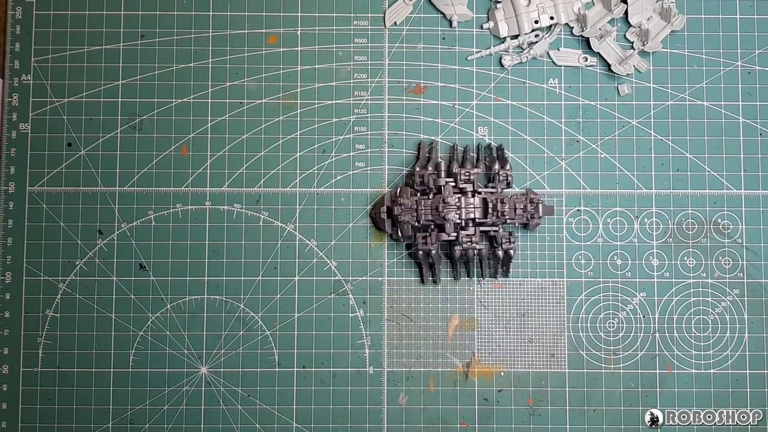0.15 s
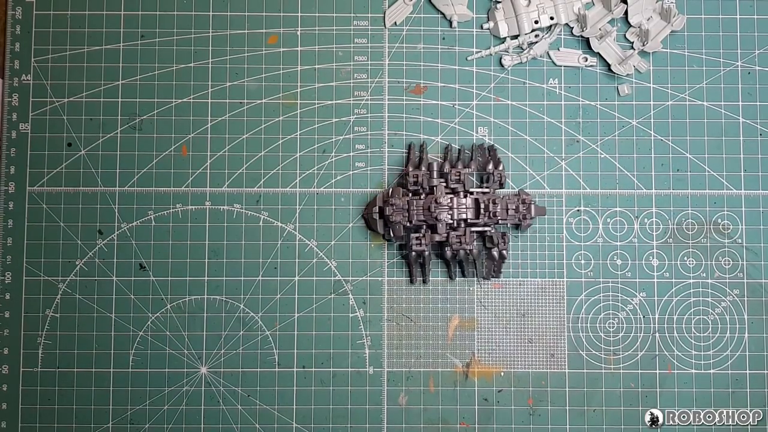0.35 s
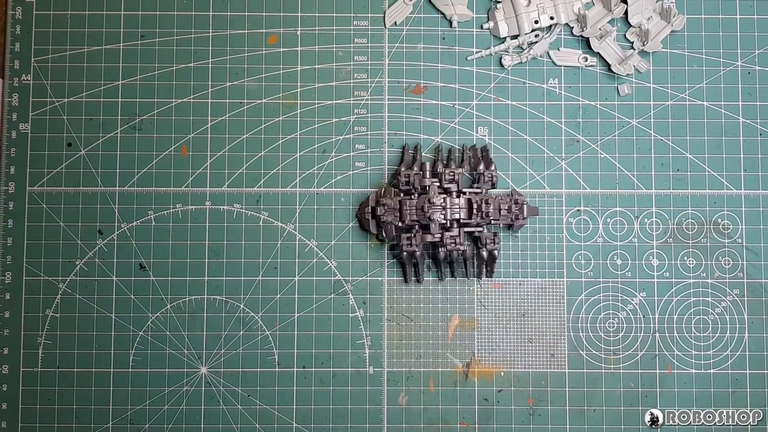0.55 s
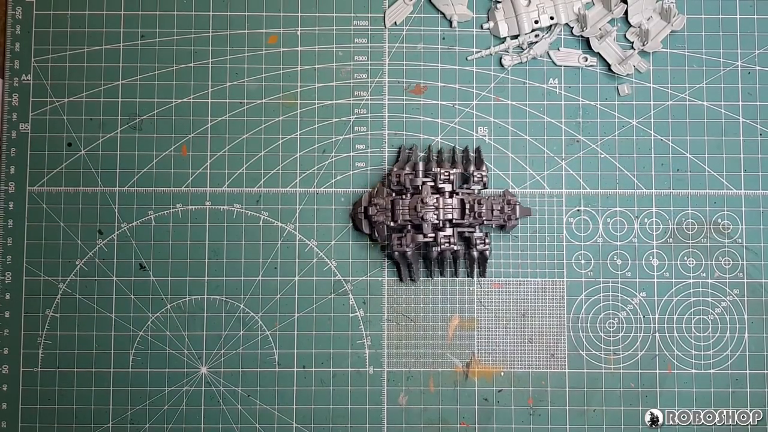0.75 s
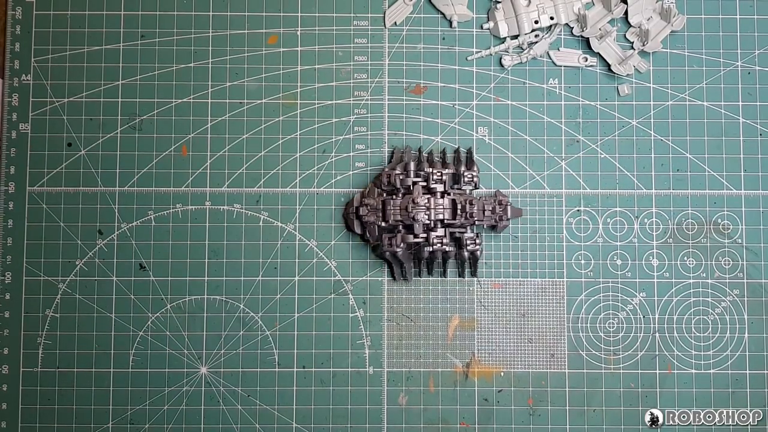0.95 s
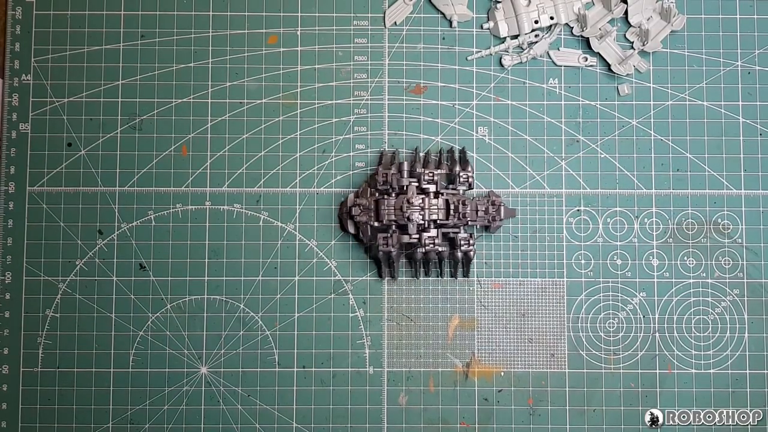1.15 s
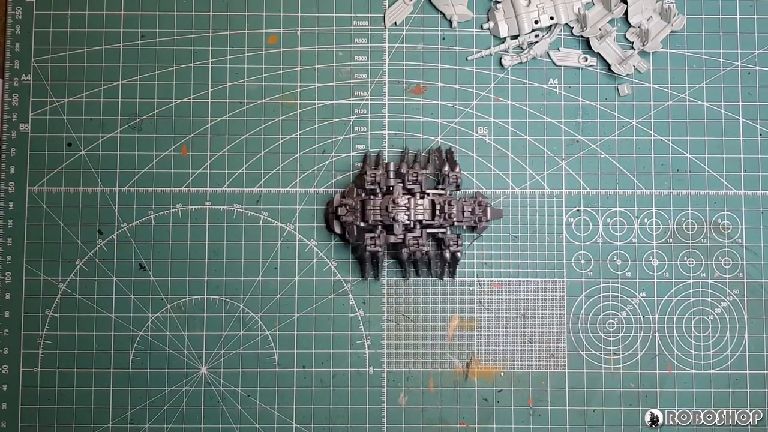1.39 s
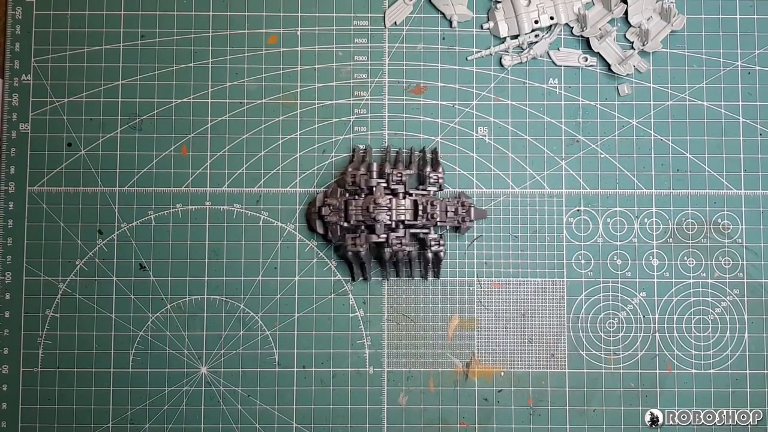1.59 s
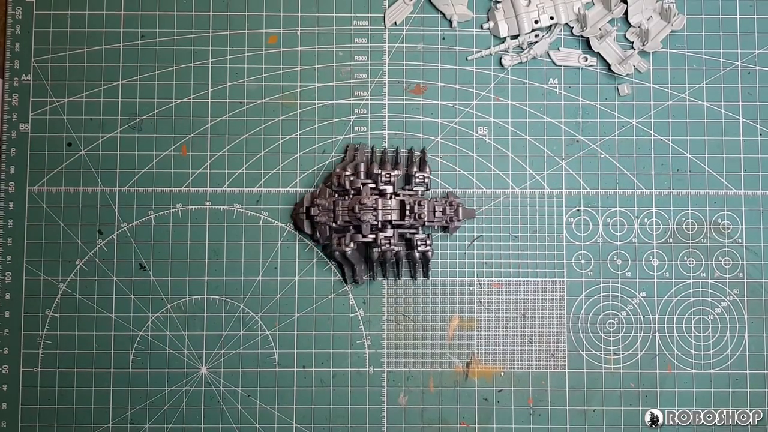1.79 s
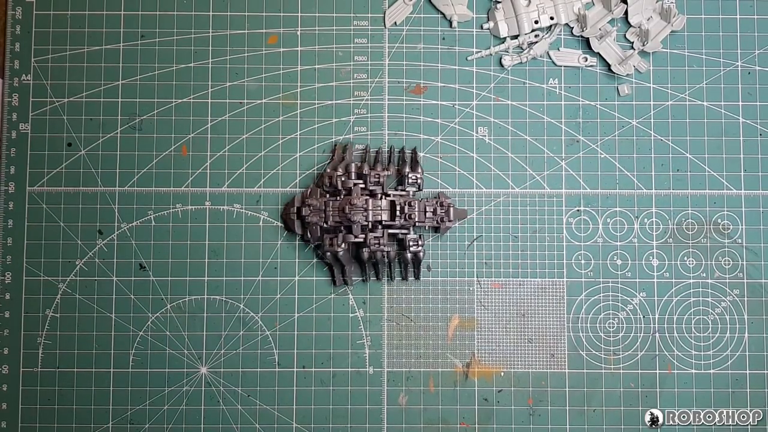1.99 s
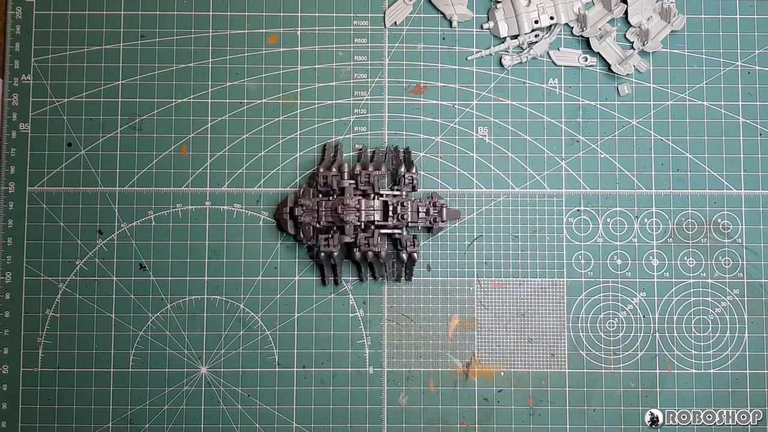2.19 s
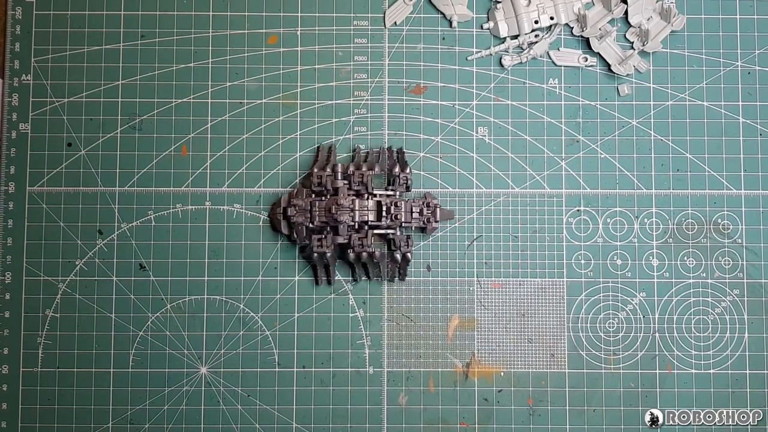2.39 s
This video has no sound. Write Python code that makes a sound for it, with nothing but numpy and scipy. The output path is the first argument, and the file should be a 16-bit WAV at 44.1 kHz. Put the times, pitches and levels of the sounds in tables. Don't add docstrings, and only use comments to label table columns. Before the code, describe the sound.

Thin, bright clockwork chatter of a tiny wind-up walking toy, wavering in speed, in a quiet room

```python
import sys
import numpy as np
from scipy import signal
from scipy.fft import rfft, irfft
from scipy.io import wavfile
from scipy.ndimage import uniform_filter1d

SR = 44100
rng = np.random.default_rng(int(sys.argv[2]) if len(sys.argv) > 2 else 0)


def inscribe(sig):
    pcm = np.round(np.clip(np.atleast_2d(sig).T, -1, 1) * 32767)
    wavfile.write(sys.argv[1], SR, pcm.astype(np.int16))


def natural_amplitude(level_db):
    exponent = np.asarray(level_db, float) / 20
    return 10 ** exponent


N = 107559


def rms_one(x):
    return x / np.sqrt(np.mean(x ** 2) + 1e-20)


def in_time(rows):
    s, *columns = np.transpose(rows)
    return [np.interp(np.arange(N) / SR, s, column) for column in columns]


def drift(rate):
    r = np.exp(-80 * np.pi * rate / SR)
    noise = rng.standard_normal(N // 40 + 2002)
    slow = signal.lfilter([1], [1, -2 * r, r * r], noise)[2000:]
    return np.interp(np.arange(N) / 40, np.arange(len(slow)), rms_one(slow))


def band(x, hz, width_hz):
    edges = [hz - width_hz / 2, hz + width_hz / 2]
    return signal.sosfilt(signal.butter(2, edges, "band", fs=SR, output="sos"), x)


def teeth():
    # time in seconds, rate in teeth per second.
    tooth_rate = [(0, 600), (.25, 608), (.45, 565), (.6, 528), (.8, 470), (.95, 508), (1.1, 533),
                  (1.27, 512), (1.38, 580), (1.5, 645), (1.68, 625), (1.8, 590), (1.96, 595), (2.04, 530),
                  (2.15, 525), (2.25, 485), (2.44, 500)]
    # time in seconds, slack from 0 to 1.
    looseness = [(0, 0.23), (.3, 0.94), (.5, 0.23), (.7, 0.82), (.95, 1.0), (1.15, 0.34), (1.5, 0.04),
                 (1.9, 0.02), (2.44, 0.26)]
    speed_waver = 0.035
    jitter, tooth_spread_db = 0.07, 2.5
    odd_tooth_db, teeth_per_turn = 4, 21
    wobble_db, rattle_ms = 2, 0.52
    grind, tick_share = 0.78, 0.83
    rate, = in_time(tooth_rate)
    slack = np.clip(in_time(looseness)[0], 0, 2)
    turn = np.cumsum(rate * (1 + speed_waver * drift(18))) / SR
    tooth = np.arange(1600)
    time_luck, size_luck, sign_luck = rng.standard_normal((3, len(tooth)))
    at = np.interp(tooth + jitter * time_luck, turn, np.arange(N)).astype(int)
    size_db = tooth_spread_db * (0.5 + slack[at]) * size_luck
    size_db = size_db + odd_tooth_db * slack[at] * (tooth % 2 - 3.0)
    size = natural_amplitude(size_db) * (tooth < turn[-1])
    r = np.exp(-1000 / rattle_ms / SR)
    bursts = rms_one(signal.lfilter([1], [1, -r], np.bincount(at, size, N)))
    clicks = rms_one(np.bincount(at, size * np.sign(sign_luck), N))
    wheel = np.sin(2 * np.pi * turn / teeth_per_turn + 1.33 * drift(5.6))
    flutter = natural_amplitude(wobble_db * slack * (wheel + 0.34 * drift(40)) + 0.5 * drift(11))
    return (bursts + grind) * flutter, tick_share * clicks * flutter


def hollows(mesh, ticks):
    # start in seconds, end in seconds, first pitch in Hz, last pitch in Hz, level in dB.
    slides = [
        (.12, 0.51, 4200, 4100, -9),
        (1.33, 1.62, 7800, 7600, -1.5),
        (1.8, 2.3, 7400, 6600, -11),
        (1.45, 1.9, 11400, 10000, -2.5),
        (2.02, 3, 5400, 4750, -8),
        (1.42, 1.9, 4200, 3600, -8.5),
        (1.9, 2.3, 2950, 3100, -13),
        (0.94, 1.45, 3100, 3000, -10),
    ]
    width_hz = 480
    t, out = np.arange(N) / SR, 0
    low = signal.butter(2, width_hz / 2, fs=SR, output="sos")
    for start, end, from_hz, to_hz, db in slides:
        part = np.clip((t - start) / (end - start), 0, 1)
        phase = 2 * np.pi * np.cumsum(from_hz + part * (to_hz - from_hz)) / SR
        a, b = signal.sosfilt(low, mesh * rng.standard_normal((2, N)) + ticks)
        swell = np.sqrt(np.sin(np.pi * part).clip(0))
        carried = np.sqrt(2) * (a * np.cos(phase) + b * np.sin(phase))
        out = out + natural_amplitude(db) * swell * carried
    return out


def gearbox(mesh, ticks):
    # time in seconds, level in dB.
    gear_level = [(0.0, -45), (0.22, -47.5), (0.5, -48), (0.54, -51), (0.65, -47.5), (0.66, -53),
                  (0.69, -48.5), (0.9, -50.5), (0.93, -49.5), (1.32, -50), (1.39, -46), (1.81, -47),
                  (1.82, -48.5), (2.0, -47.5), (2.01, -50), (2.33, -49.5), (2.44, -50.5)]
    # time in seconds, strain from 0 to 1, lean from 0 to 1.
    posture = [(0, 0.03, 0), (.13, .15, 0.2), (.3, 0.22, .5), (.5, 0.47, 0), (.56, 0.2, 0.25),
               (.95, 0, 0.24), (1.1, 0.5, 0.2), (1.3, 0.57, 0.2), (1.42, .95, 0.26), (1.55, 0.8, 0.4),
               (1.8, 0.86, 0), (1.99, 1, 0.5), (2.02, 0.84, 1.0), (2.25, 0.62, .9), (2.44, 0.53, 0.4)]
    # frequency in Hz, width in Hz, level at rest in dB,
    # gain by strain in dB, gain by lean in dB.
    shell_modes = [(3226, 478, -11.5, 4, 4), (3970, 650, -8, 5, -10), (4584, 790, -9, 2, 3.5),
                   (5400, 1000, -16.5, 9, 0), (6434, 740, -9.5, 7.5, -1.5), (7090, 625, 2, -7, -1.5),
                   (7760, 610, -8.5, 7.5, -9.5), (8500, 380, -8, -2, 2), (9700, 1600, -13, 0.5, -7.5),
                   (10220, 840, -9, 4.5, 2), (11160, 700, -13, 9.5, 1.5), (11900, 2000, -14, 5, -6.5),
                   (14160, 1200, -8, -12, -8), (14900, 1500, -13.5, 4.5, 3.5)]
    # frequency in Hz, width in Hz, level at rest in dB,
    # gain by strain in dB.
    plate_modes = [(3475, 250, -14.5, 4), (6350, 84, -18.5, 4), (6625, 33, -4.5, 2.5), (7290, 53, 3.5, -3),
                   (10200, 54, -8.5, -1), (10760, 33, -9, 8), (10600, 35, -11, 17), (11370, 26, -12, 9)]
    own_db, shell_edge_hz = 0.76, 2736
    strain, lean = in_time(posture)
    out = hollows(mesh, ticks)
    for hz, width, db, strain_db, lean_db in shell_modes:
        gain = natural_amplitude(db + strain * strain_db + lean * lean_db + own_db * drift(8.6))
        out = out + gain * band(mesh * rng.standard_normal(N) + ticks, hz, width)
    for hz, width, db, strain_db in plate_modes:
        gain = natural_amplitude(db + strain * strain_db + 2.04 * drift(7.1))
        out = out + gain * band(mesh * rng.standard_normal(N), hz, width)
    out = signal.sosfilt(signal.butter(4, shell_edge_hz, "high", fs=SR, output="sos"), out)
    running_rms = np.sqrt(uniform_filter1d(out ** 2, size=4000))
    return natural_amplitude(in_time(gear_level)[0]) * out / running_rms


def belly(mesh, ticks):
    # time in seconds, level in dB.
    belly_level = [(0.0, -64.5), (0.08, -68.5), (0.21, -62.5), (0.55, -67), (0.6, -63), (0.77, -69.5),
                   (1.07, -68.5), (1.09, -61.5), (1.16, -71), (1.18, -60), (1.23, -60.5), (1.83, -71.5),
                   (1.92, -67.5), (1.93, -72.5), (2.24, -65), (2.44, -65.5)]
    # time in seconds, shift from -1 (aft) to 1 (fore).
    weight_shift = [(0, -.3), (.15, -0.54), (.43, -1.2), (.52, 0.79), (.63, 0.18), (.7, 0.28), (.8, 0.57),
                    (1.02, 0.67), (1.1, -0.49), (1.2, 0.31), (1.35, -0.19), (1.5, 0.0069), (1.8, 0.17),
                    (2.1, 0.42), (2.33, -0.88), (2.44, 0.62)]
    # frequency in Hz, width in Hz, level in dB, gain by shift in dB.
    hull_modes = [(916, 128, -11.5, -2), (1075.4, 78, 1, -4.5), (1300, 403, -2.5, -2.5),
                  (1414, 95, -6.5, 5), (1535, 95, 1.5, 3), (1670, 120, -2, 7), (1930, 540, -11.5, 1)]
    hull_tick = 0.23
    shift, = in_time(weight_shift)
    push = hull_tick * rms_one(abs(ticks))
    out = 0
    for hz, width, db, shift_db in hull_modes:
        gain = natural_amplitude(db + shift * shift_db + 1.4 * drift(7.7))
        out = out + gain * band((mesh + 1.8) * rng.standard_normal(N) + push, hz, width)
    return natural_amplitude(in_time(belly_level)[0]) * rms_one(out)


def feet():
    # start in seconds, length in seconds, level in dB.
    scuffs = [
        (.16, 0.092, -83),
        (1.05, .2, -78.5),
        (1.5, 0.11, -84),
        (1.654, 0.055, -83),
        (2.058, .07, -76),
    ]
    t, scuffing = np.arange(N) / SR, 0
    for start, length, db in scuffs:
        scuffing = scuffing + natural_amplitude(db) * np.sin(np.pi * np.clip((t - start) / length, 0, 1))
    return scuffing * rms_one(band(rng.standard_normal(N), 630, 220))


def desk(x, count=7):
    t60_s, level_db = 0.063, -10.5
    t, place, wet = np.arange(4000) / SR, np.linspace(0, count - 1, N), 0
    for k in range(count):
        tail = rng.standard_normal(len(t)) * natural_amplitude(-60 * t / t60_s) * (t > 0.001)
        here = np.cos(np.pi / 2 * np.clip(place - k, -1, 1))
        wet = wet + signal.fftconvolve(x * here, tail / np.sqrt(np.sum(tail ** 2)))[:N]
    return (x + natural_amplitude(level_db) * wet) / np.sqrt(1 + natural_amplitude(2 * level_db))


def thin_band(x):
    notch_hz, width_hz = 2543, 350
    return x - 0.38 * signal.lfilter(*signal.iirpeak(notch_hz, notch_hz / width_hz, fs=SR), x)


def room():
    # frequency in Hz, level in dB per Hz.
    rumble_spectrum = [(12, -39), (20, -27), (39, -2.5), (118, -3), (249, -12.5), (278, -16), (498, -17.5),
                       (746, -15.5), (950, -30.5), (1240, -50), (2090, -120)]
    # frequency in Hz, level in dB.
    hum_tones = [(49.5, -86.5), (100.5, -76), (121, -84.5)]
    rumble_db, hiss_db = -71 - 2.0, -90
    hz, (at, db) = np.fft.rfftfreq(N, 1 / SR), np.transpose(rumble_spectrum)
    shape = natural_amplitude(np.interp(np.log(hz + 1), np.log(at), db, right=-90))
    rumble = natural_amplitude(rumble_db) * rms_one(irfft(shape * rfft(rng.standard_normal(N)), N))
    t, hum = np.arange(N) / SR, 0
    for tone_hz, tone_db in hum_tones:
        hum = hum + natural_amplitude(tone_db + 3.7 * drift(5.7)) * np.sin(2 * np.pi * tone_hz * t)
    return rumble + hum + natural_amplitude(hiss_db) * rng.standard_normal(N)


def scene():
    mesh, ticks = teeth()
    toy = desk(gearbox(mesh, ticks) + belly(mesh, ticks) + feet())
    return (thin_band(toy) + room())[None]


def roll_off(x):
    return signal.sosfilt(signal.butter(12, 16730, fs=SR, output="sos"), x)


def record(dry):
    cutoff_hz, slope_hz = 15745, 60
    keep = np.clip((cutoff_hz - np.fft.rfftfreq(N, 1 / SR)) / slope_hz + 0.5, 0, 1)
    return roll_off(irfft(rfft(dry) * keep, N))


dry = scene()
out = record(dry)
inscribe(out)
```